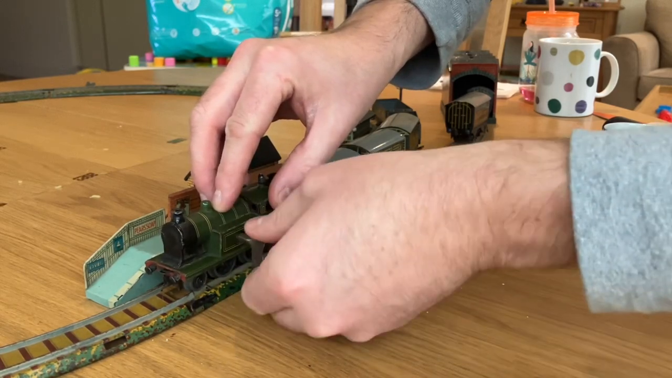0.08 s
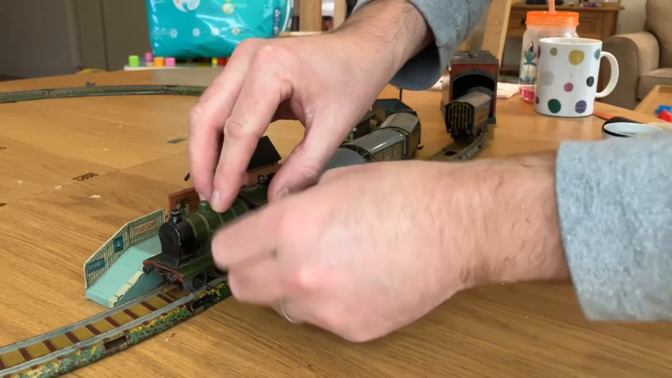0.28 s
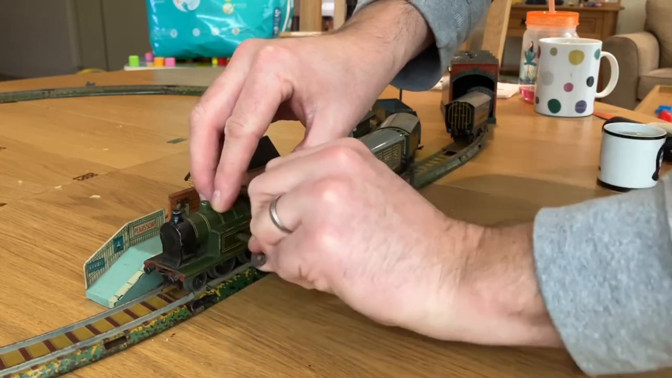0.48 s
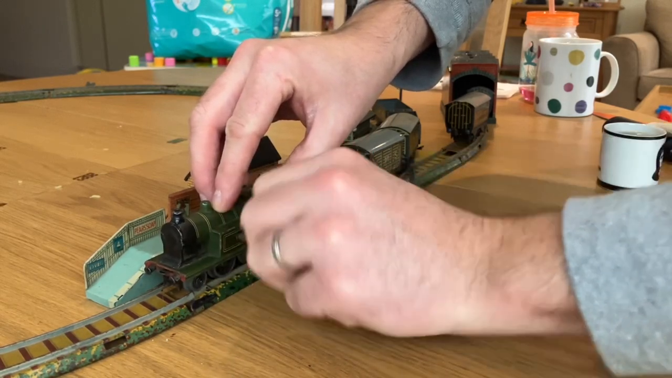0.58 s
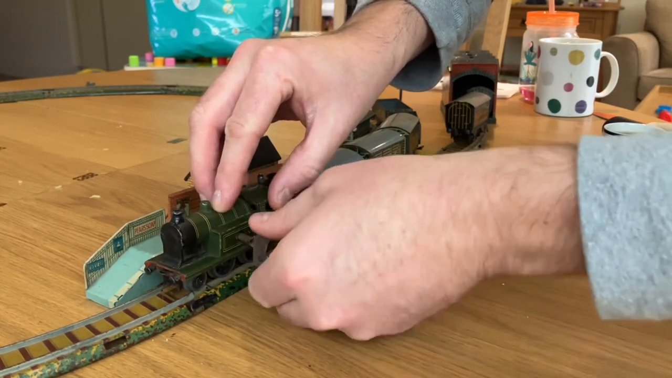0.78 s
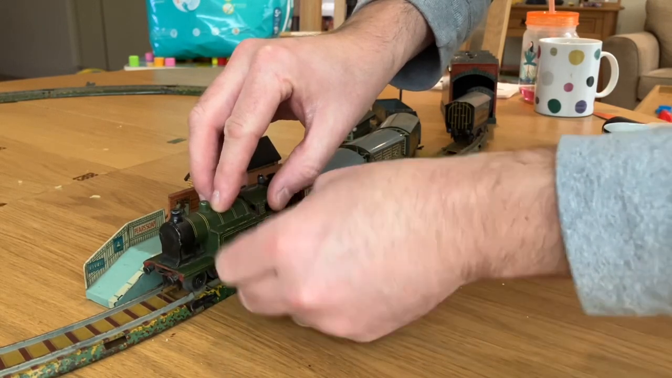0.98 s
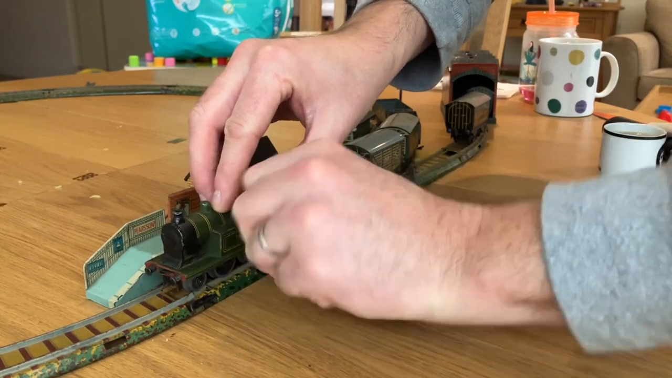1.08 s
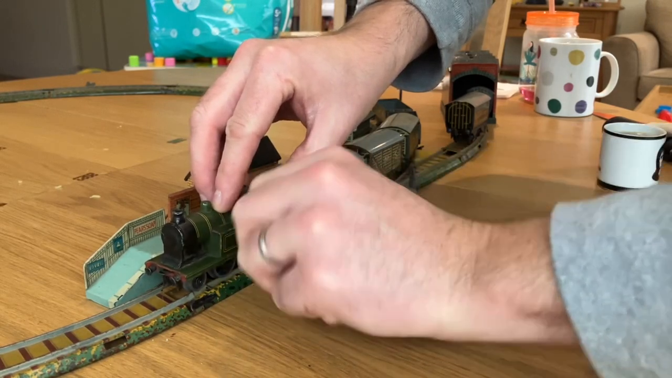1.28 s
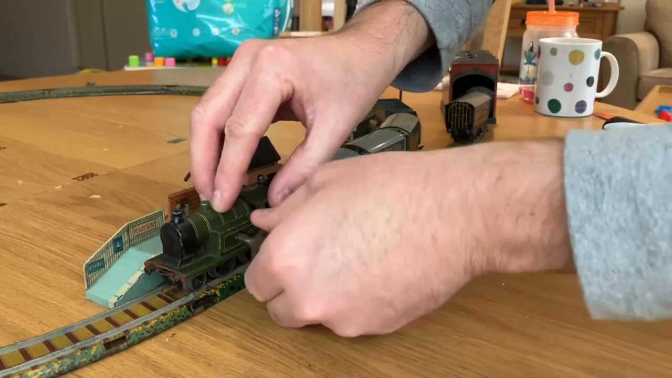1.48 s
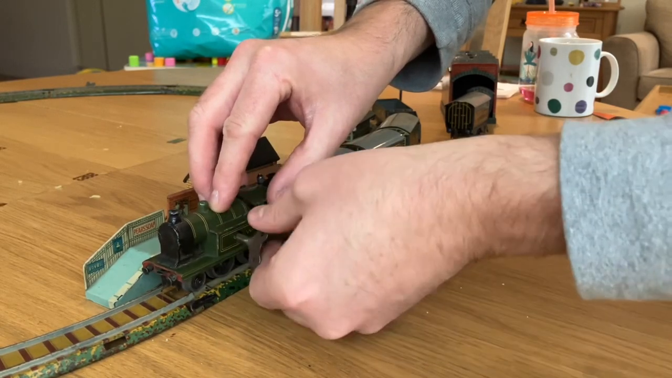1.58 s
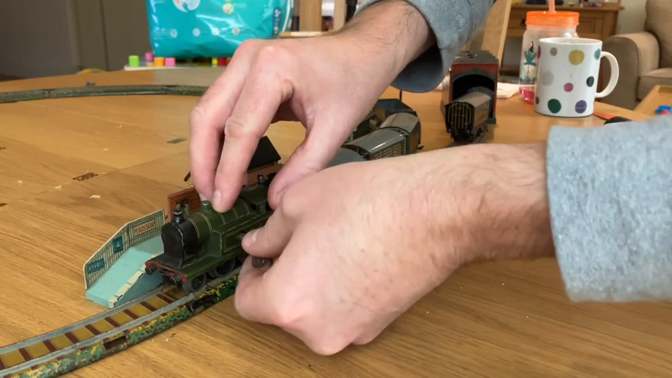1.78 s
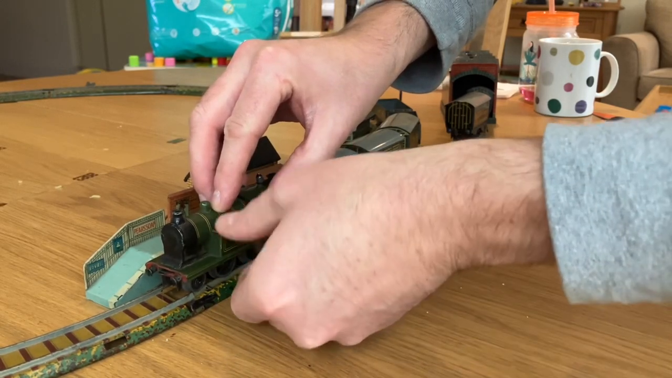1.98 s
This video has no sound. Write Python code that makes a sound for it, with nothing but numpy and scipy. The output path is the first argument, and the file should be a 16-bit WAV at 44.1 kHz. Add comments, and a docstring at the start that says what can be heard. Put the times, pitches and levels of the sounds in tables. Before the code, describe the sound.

A clockwork tin toy train is wound by hand, ratchet snapping sharply in two bursts of four clicks

```python
"""A low handling rumble and still air open the scene, then a light knock as a key takes up its slack.
A tinplate clockwork locomotive is wound by hand on a wooden table in a living room: in each of two turns
the pawl snaps over four ratchet teeth and the tin shell rings. Fingers rub and the toy bumps dully.
Snaps, knock edges, clatter and thuds are short noise bursts; shell and table ring as decaying sine modes;
rubs and hisses are shaped grains and noise. Two reflections and a diffuse tail make the room."""
import sys
import numpy as np
from scipy import signal
from scipy.fft import rfft, irfft
from scipy.io import wavfile

SR = 44100
rng = np.random.default_rng(int(sys.argv[2]) if len(sys.argv) > 2 else 0)


def wav_record(signal):
    """Record a signal, one row per channel, as 16-bit PCM in the file named by sys.argv[1]."""
    frames = np.transpose(np.atleast_2d(signal))
    bounded = np.clip(frames, -1, 1)
    # unit amplitude maps onto the largest positive 16-bit level
    quanta = np.round(bounded * 32767).astype(np.int16)
    wavfile.write(sys.argv[1], SR, quanta)


N = 88200
T = np.arange(N) / SR
SIDES = np.array([[1], [-1]])  # the side part enters left and right with opposite sign


def from_db(db):
    """Decibels to gain."""
    return 10 ** (np.asarray(db) / 20)


def rms_one(x):
    """Scale to unit rms."""
    return x / np.sqrt(np.mean(x ** 2) + 1e-20)


def at_hz(points, hz):
    """Read a table on a log-frequency axis."""
    f, v = np.transpose(points)
    return np.interp(np.log(np.maximum(hz, 1)), np.log(f), v)


def colour(x, spectrum):
    """Give noise or grains a spectrum; rms 1."""
    size = x.shape[-1]
    gain = from_db(at_hz(spectrum, np.fft.rfftfreq(size, 1 / SR)))
    return rms_one(irfft(rfft(x) * gain, size))


# Stereo spread of diffuse sound. Each row: frequency in Hz, side against mid in dB before the width factor.
STEREO_WIDTH = [(100, -17.5), (500, -3.5), (1500, -3.5), (5000, -1), (6500, -6.5), (8000, -38),
                (16000, -20)]


def noise(spectrum, width, size=N):
    """Stereo noise: a common part and a side part that fades in bass and treble."""
    mid, side = rng.standard_normal((2, size))
    side_gain = from_db(at_hz(STEREO_WIDTH, np.fft.rfftfreq(size, 1 / SR)))
    side = irfft(rfft(side) * side_gain, size)
    return colour(mid + width * side * SIDES, spectrum)


def add(out, s, x):
    """Mix x in from time s."""
    i = max(int(s * SR), 0)
    out[..., i:i + x.shape[-1]] += x[..., :max(N - i, 0)]


def bursts(hits, spectrum, rise_s, t60, width):
    """Each hit (s, dB) is a coloured noise burst: a straight rise, then an exponential decay."""
    out, t = np.zeros((2, N)), T[:SR // 16]
    shape = np.minimum(t / rise_s, 1) * from_db(-60 * np.maximum(t - rise_s, 0) / t60)
    shape_rms = np.sqrt(np.mean(shape ** 2))
    for s, db in hits:
        burst = rms_one(noise(spectrum, width, size=len(t)) * shape)
        add(out, s, from_db(db) * shape_rms * burst)
    return out


def struck(hits, modes, spread_db):
    """Each hit (s, dB) rings every mode as a decaying sine with a strength of its own."""
    out, t = np.zeros(N), T[:SR // 3]
    hz, level_db, t60 = np.transpose(modes)[:, :, None]
    rings = np.sin(2 * np.pi * hz * t) * from_db(level_db - 60 * t / t60)
    signs = (-1) ** np.arange(len(modes))
    for s, db in hits:
        strengths = from_db(db + spread_db * rng.standard_normal(len(modes)))
        add(out, s, (signs * strengths) @ rings)
    return out


def pan(left_db):
    """Gains of the two channels: left up and right down by the same dB."""
    return from_db([[left_db], [-left_db]])


# Colour of the still air. Each row: frequency in Hz, relative density in dB per Hz.
AIR_COLOUR = [(20, -7.5), (120, -4), (300, -19.5), (700, -18), (1200, -7.5), (2200, -16.5), (3300, -11),
              (6000, -22.5), (10000, -18.5), (16000, -39)]


def still_air():
    """Quiet air is steady coloured noise, 65 dB below unit rms."""
    return from_db(-65) * noise(AIR_COLOUR, width=1.37)


# The toy rumbling in the hand, as a gliding level. Each row: time in seconds, level in dB before panning.
HANDLING_LEVEL = [(0, -67), (.14, -66.5), (.24, -51.5), (.38, -55), (.56, -57), (.65, -69.5), (.76, -52.5),
                  (.85, -73.5), (.94, -59), (1.0, -51.5), (1.13, -50.5), (1.22, -63.5), (1.34, -65),
                  (1.55, -56.5), (1.64, -70.5), (1.82, -52.5), (1.87, -64), (2, -55)]
# Colour of that rumble. Each row: frequency in Hz, relative density in dB per Hz.
RUMBLE_COLOUR = [(20, -19), (50, -7.5), (80, -7), (115, -1), (155, -6), (200, -4.5), (330, -19), (600, -31),
                 (1500, -63), (6000, -77)]
# The toy bumps on the wood. Each row: start in seconds, relative level in dB.
TABLE_BUMPS = [(.181, -49), (.522, -47.5), (.689, -37), (.718, -60), (.778, -61), (1.272, -49),
               (1.2875, -36.5), (1.421, -44), (1.716, -50.5), (1.804, -49), (1.934, -47.5)]
# The pawl drops off a tooth. Each row: start in seconds, then snap, shell and table relative levels in dB.
TOOTH_DROPS = [(0.2421, -11, -24.5, -47.5), (.3019, -13, -21.5, -43), (0.3535, -12.5, -24.5, -58),
               (0.4471, -10.5, -24.5, -42.5), (0.9715, -11.5, -24.5, -45.5), (1.0227, -13, -24, -41),
               (1.0654, -11, -25.5, -45.5), (1.1254, -11.5, -26, -61)]
# Ringing of the table top. Each row: mode frequency in Hz, relative level in dB, t60 in seconds.
TABLE_MODES = [(93, -9, 0.14), (117.5, -3.5, 0.26), (203.4, -11.5, 0.14), (229.5, -9.5, 0.081),
               (310, -5.5, 0.022), (500, -13.5, .025)]
# Colour of the soft push in each bump. Each row: frequency in Hz, relative density in dB per Hz.
THUD_COLOUR = [(30, -4.5), (70, 3.5), (200, -2), (450, -9), (650, -32), (1500, -50.5)]
THUD_DB, THUD_RISE_S, THUD_T60_S = -7.5, 0.0037, 0.056
TABLE_LEFT_DB = 1.98


def table():
    """The table top rings under bumps and snaps, thuds under bumps and rumbles under the hands."""
    snaps = [(s, db) for s, _, _, db in TOOTH_DROPS]
    rings = struck(TABLE_BUMPS + snaps, TABLE_MODES, spread_db=2.5)
    thuds = from_db(THUD_DB) * bursts(TABLE_BUMPS, THUD_COLOUR, THUD_RISE_S, THUD_T60_S, width=0.94)
    handling = from_db(np.interp(T, *np.transpose(HANDLING_LEVEL)))
    rumble = handling * noise(RUMBLE_COLOUR, width=1.0)
    return pan(TABLE_LEFT_DB) * (rings + thuds + rumble)


# The key knocks in its slack. Each row: start in seconds, then shell and bright edge relative levels in dB.
KEY_KNOCKS = [(0.146, -32.5, -29.5), (.2070, -34, -39.5), (0.507, -36.5, -32), (.6000, -49, -51),
              (.8835, -33, -28), (1.2440, -30, -31), (1.2703, -38.5, -37.5), (1.4800, -49.5, -47),
              (1.578, -44.5, -64), (1.7627, -32.5, -29), (1.9173, -42.5, -76)]
# Colour of the bright knock edge. Each row: frequency in Hz, relative density in dB per Hz.
EDGE_COLOUR = [(2000, -15), (4500, -15), (5500, 7.5), (9000, 3), (12000, 7.5), (15500, -1), (17000, 5.5)]
HARD_RISE_S, EDGE_T60_S = 0.00058, 0.02
SLIDE_S, SLIDE_DB = 0.0025, -7  # the key slides just before it knocks: lead time, level against the edge
CHATTER_S, CHATTER_DB = 0.037, -19.5  # loose parts: longest delay, level against the shell's


def key():
    """A short slide, then the bright edge of the knock; loose parts chatter three times after each snap."""
    edges = [(s, db) for s, _, db in KEY_KNOCKS]
    slides = [(s - SLIDE_S, db + SLIDE_DB) for s, db in edges]
    chatter = [(s + CHATTER_S * late, db + CHATTER_DB)
               for s, _, db, _ in TOOTH_DROPS for late in rng.random(size=3)]
    return bursts(edges + slides + chatter, EDGE_COLOUR, HARD_RISE_S, EDGE_T60_S, width=0.7)


# Ringing of the tin shell. Each row: mode frequency in Hz, relative level in dB, t60 in seconds.
SHELL_MODES = [(1265, -19, 0.054), (1474, -14.5, .03), (1591, -14, 0.048), (1722, -8, 0.017),
               (2280, -32, 0.051), (2870, -9, 0.0073), (3102, -5, 0.018), (3388, -8, 0.034),
               (3804, -13.5, 0.042), (5500, -9.5, 0.041), (6934, -15, 0.026), (7840, -13, 0.027)]
# Colour of the dense shell clatter. Each row: frequency in Hz, relative density in dB per Hz.
CLATTER_COLOUR = [(100, -28.5), (300, -12.5), (700, -26), (1100, -5), (1600, -7), (2900, 1.5), (4600, -6.5),
                  (7000, -5.5), (12000, -18), (16000, -27)]
CLATTER_DB, CLATTER_RISE_S, CLATTER_T60_S = -2.5, 0.0012, 0.031
KNOCK_RING_DB, TOOTH_RING_DB = 0.5, -3  # a blunt knock rings the modes more purely than a snap
SHELL_LAG_S, SHELL_LEFT_DB = 0.00061, 2.2


def shell():
    """The tin body answers every snap and knock with its modes and a dense clatter."""
    snaps = [(s + SHELL_LAG_S, db) for s, _, db, _ in TOOTH_DROPS]
    knocks = [(s + SHELL_LAG_S, db) for s, db, _ in KEY_KNOCKS]
    clatter = bursts(snaps + knocks, CLATTER_COLOUR, CLATTER_RISE_S, CLATTER_T60_S, width=1.0)
    snap_rings = from_db(TOOTH_RING_DB) * struck(snaps, SHELL_MODES, spread_db=0.5)
    knock_rings = from_db(KNOCK_RING_DB) * struck(knocks, SHELL_MODES, spread_db=1.5)
    return pan(SHELL_LEFT_DB) * (from_db(CLATTER_DB) * clatter + snap_rings + knock_rings)


# Colour of the steel snap. Each row: frequency in Hz, relative density in dB per Hz.
SNAP_COLOUR = [(3000, -30), (6000, -15), (7500, 2.5), (9300, 8), (10000, 3.5), (10500, 4.5), (12700, 12),
               (14500, 6), (15700, 5.5), (17000, -57)]
# Colour of the chassis taking the recoil. Each row: frequency in Hz, relative density in dB per Hz.
RECOIL_COLOUR = [(60, -33.5), (250, 1.5), (450, -1.5), (750, -20.5), (1100, -9.5), (2500, -10)]
SNAP_T60_S = 0.0081
RECOIL_DB, RECOIL_RISE_S, RECOIL_T60_S = -13, 0.0027, 0.045  # level is against the shell's


def pawl():
    """Hard steel snaps of the ratchet, each with a dull recoil of the chassis."""
    snap_hits = [(s, db) for s, db, _, _ in TOOTH_DROPS]
    recoil_hits = [(s + SHELL_LAG_S, db + RECOIL_DB) for s, _, db, _ in TOOTH_DROPS]
    snaps = bursts(snap_hits, SNAP_COLOUR, HARD_RISE_S, SNAP_T60_S, width=0.17)
    recoil = bursts(recoil_hits, RECOIL_COLOUR, RECOIL_RISE_S, RECOIL_T60_S, width=0.54)
    return snaps + pan(TABLE_LEFT_DB) * recoil


def strokes(rows, rise_s):
    """Summed gain of strokes (s, length, dB) that rise, hold and fade to a faint lasting residue."""
    gain = np.zeros(N)
    for s, length, db in rows:
        held = s + rise_s
        times = [s, held, held + length / 3, held + length]
        gain += from_db(db) * np.interp(T, times, [0, 0.85, 0.8, 0.022])
    return gain


# Fingers rub on key and shell. Each row: start in seconds, length after the rise in seconds, relative level in dB.
FINGER_RUBS = [(.27, 0.058, -58.5), (.585, 0.042, -61), (1.0, 0.15, -52.5), (1.268, 0.019, -47.5),
               (1.512, 0.044, -52), (1.577, 0.015, -57), (1.639, 0.029, -60.5), (1.826, 0.022, -56.5),
               (1.887, 0.032, -52), (1.915, 0.044, -52), (1.966, 0.023, -48)]
# Colour of the rub. Each row: frequency in Hz, relative density in dB per Hz.
RUB_COLOUR = [(150, -2), (600, -7.5), (1000, -4), (1400, -1), (2300, -11), (4000, -19), (8000, -23),
              (16000, -38)]
# Faint high hiss as the hand slides to a new grip.
# Each row: start in seconds, length after the rise in seconds, relative level in dB.
HAND_BRUSHES = [(.68, 0.054, -56), (1.395, 0.082, -58.5), (1.52, .06, -68), (1.79, 0.027, -59.5)]
# Colour of that hiss. Each row: frequency in Hz, relative density in dB per Hz.
BRUSH_COLOUR = [(1000, -32.5), (3500, -2.5), (6000, -3.5), (11000, 0), (15000, -0.5), (17000, -21)]
RUB_GRAINS_PER_S, RUB_SIZE_SPREAD_DB = 1400, 2.5


def fingers():
    """Skin sticks and slips on the metal in short grainy strokes, and hisses as it slides."""
    sizes = from_db(RUB_SIZE_SPREAD_DB * np.minimum(rng.exponential(1, N), 3))
    signed_sizes = sizes * rng.choice([-1, 1], N)
    slips = (rng.random(N) < RUB_GRAINS_PER_S / SR) * signed_sizes
    texture = colour(slips, RUB_COLOUR) + 0.56 * noise(RUB_COLOUR, width=1.5)
    rubs = strokes(FINGER_RUBS, rise_s=0.0012) * texture
    hiss = strokes(HAND_BRUSHES, rise_s=0.015) * noise(BRUSH_COLOUR, width=0.74)
    return pan(SHELL_LEFT_DB) * rubs + hiss


# Colour of the room tail. Each row: frequency in Hz, relative level in dB.
ROOM_COLOUR = [(100, -16.5), (500, -6), (1400, -3), (3000, -4.5), (5000, -6), (7500, -11.5), (9300, -12.5),
               (12000, -18.5), (16000, -24.5)]
# Decay of the room tail. Each row: band centre in Hz, t60 in seconds.
ROOM_DECAY = [(100, 1), (1000, 0.24), (3500, 0.43), (8000, 0.42), (16000, 0.95)]
# Early reflections. Each row: delay in seconds, level against the direct sound in dB.
REFLECTIONS = [(0.0112, -25), (0.0158, -20.5)]
ROOM_GAP_S, ROOM_RISE_S = 0.0017, 0.002


def room(x):
    """Two early reflections and a diffuse noise tail whose decay time depends on frequency."""
    t = T[:SR * 4 // 5]
    hz = np.fft.rfftfreq(len(t), 1 / SR)
    mid, side = rfft(rng.standard_normal((2, len(t)))) * from_db(at_hz(ROOM_COLOUR, hz))
    wash = mid + side * from_db(at_hz(STEREO_WIDTH, hz)) * SIDES
    rise = np.clip((t - ROOM_GAP_S) / ROOM_RISE_S, 0, 1)
    tail = 0
    for k, (_, t60) in enumerate(ROOM_DECAY):
        # overlapping bands crossfade from one centre to the next
        share = at_hz([(f, j == k) for j, (f, _) in enumerate(ROOM_DECAY)], hz)
        shape = from_db(-60 * t / t60) * rise
        tail = tail + irfft(wash * share, len(t)) * shape / np.sqrt(np.sum(shape ** 2))
    out = signal.fftconvolve(x.mean(0)[None], tail, axes=1)[:, :N]
    for s, db in REFLECTIONS:
        add(out, s, from_db(db) * x)
    return out


def scene():
    """The toy, the room around it and still air."""
    toy = table() + key() + shell() + pawl() + fingers()
    return still_air() + toy + room(toy)


# Left microphone against the right. Each row: frequency in Hz, phase in radians.
LEFT_PHASE = [(0, 0), (1500, .4), (2300, 2.1), (3000, 3.2), (5600, 3.2), (6700, 0), (9050, -3.14),
              (13600, -9.42), (22050, -21.1)]


def record(dry):
    """Two closely spaced microphones hear the treble out of step; the top is cut steeply."""
    size = N + SR // 10  # padding keeps the phase shift from wrapping round
    hz = np.fft.rfftfreq(size, 1 / SR)
    turn = np.exp(1j * np.interp(hz, *np.transpose(LEFT_PHASE)))
    left = irfft(rfft(dry[0], size) * turn, size)[:N]
    pair = np.array([left, dry[1]])
    # 0.2 dB passband ripple, 80 dB stopband, edge at 16600 Hz
    low_pass = signal.ellip(10, 0.2, 80, 16600, fs=SR, output="sos")
    return signal.sosfilt(low_pass, pair)


dry = scene()
out = record(dry)
wav_record(out)
```